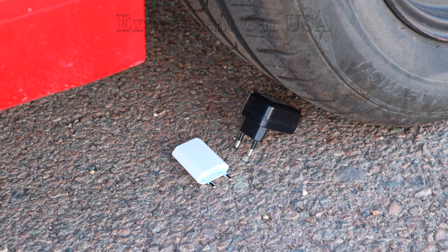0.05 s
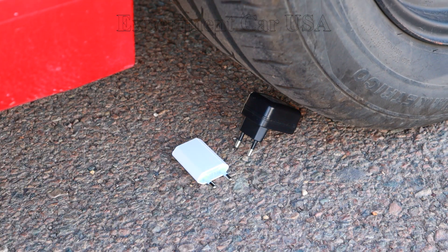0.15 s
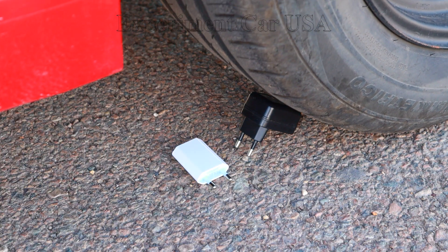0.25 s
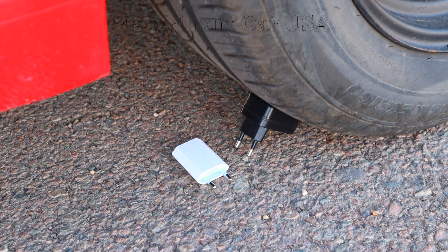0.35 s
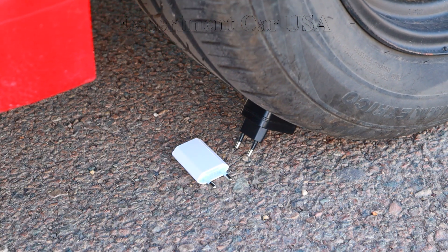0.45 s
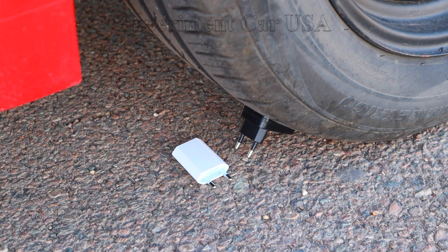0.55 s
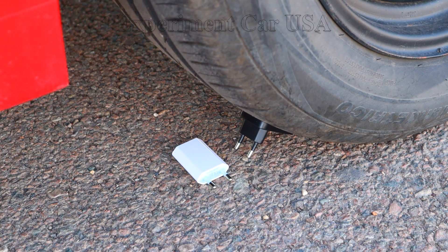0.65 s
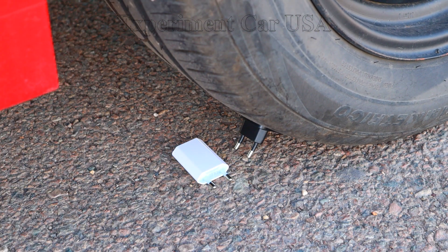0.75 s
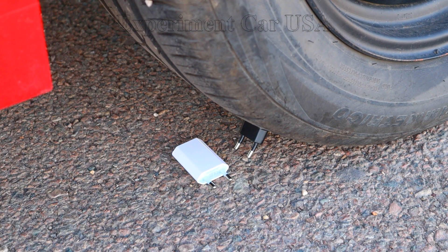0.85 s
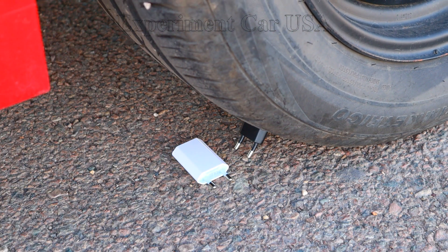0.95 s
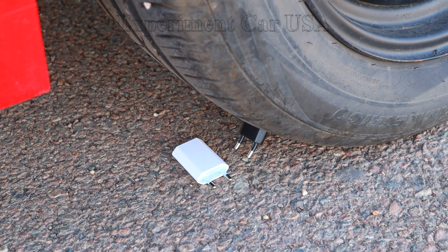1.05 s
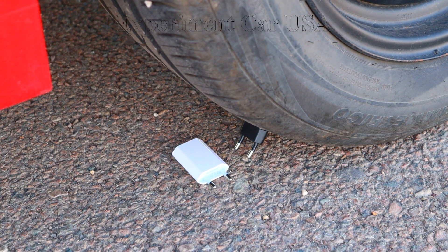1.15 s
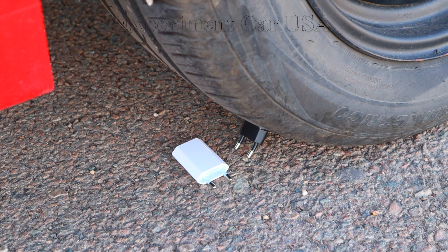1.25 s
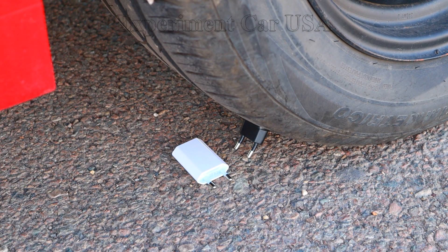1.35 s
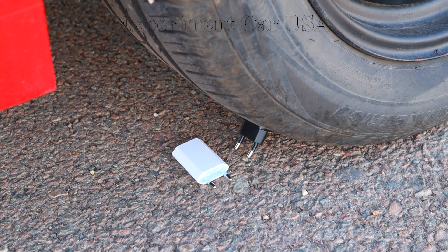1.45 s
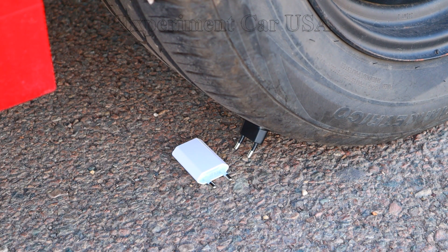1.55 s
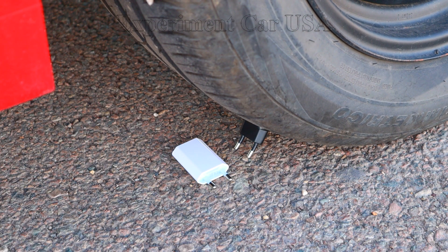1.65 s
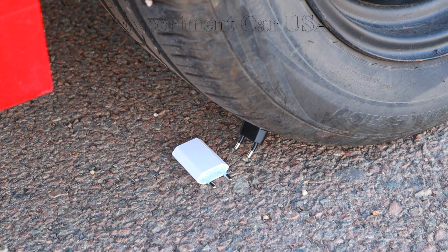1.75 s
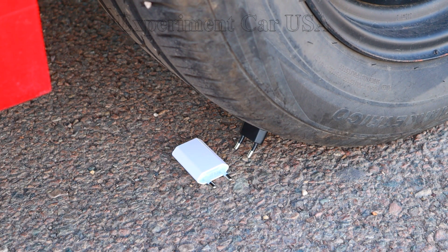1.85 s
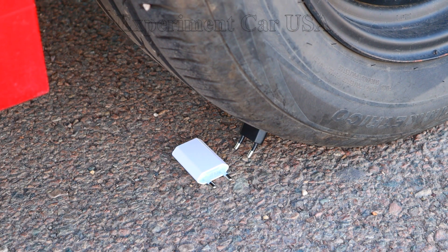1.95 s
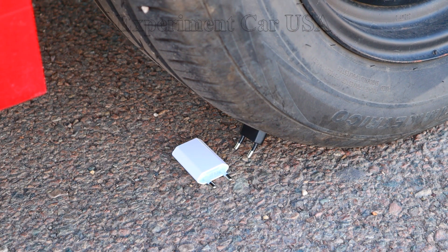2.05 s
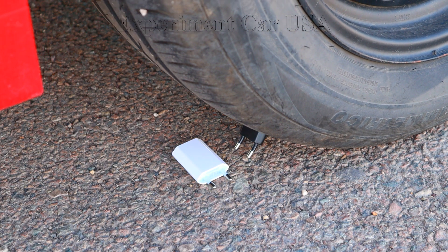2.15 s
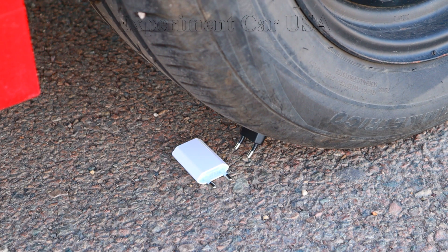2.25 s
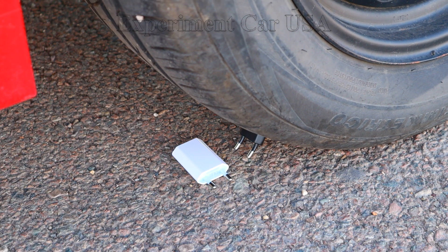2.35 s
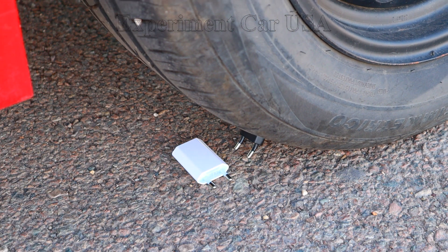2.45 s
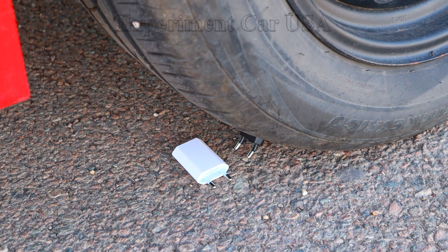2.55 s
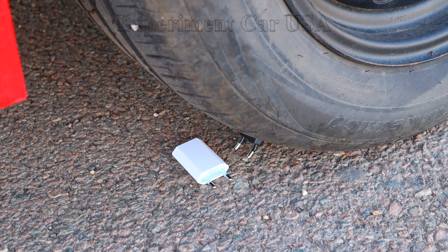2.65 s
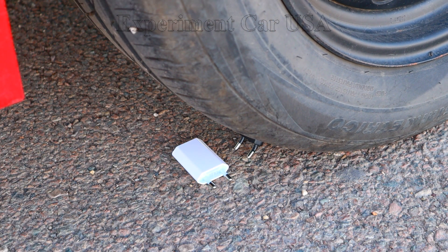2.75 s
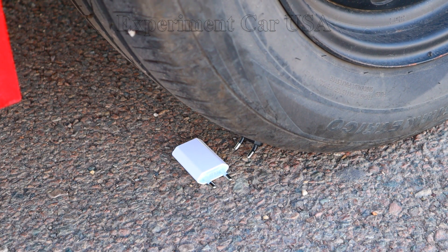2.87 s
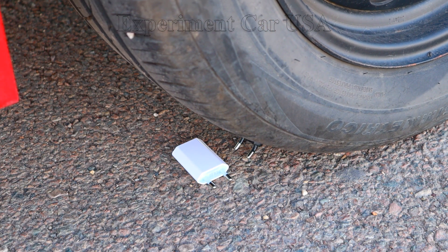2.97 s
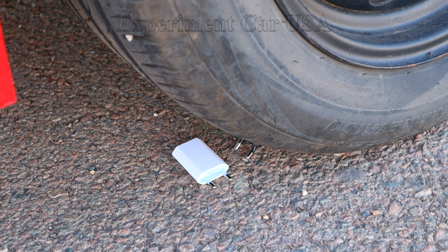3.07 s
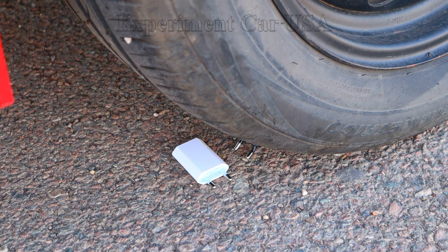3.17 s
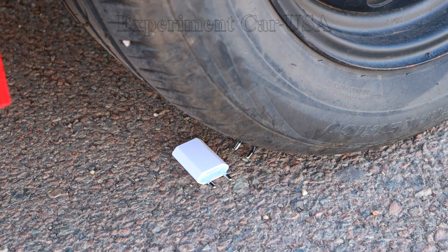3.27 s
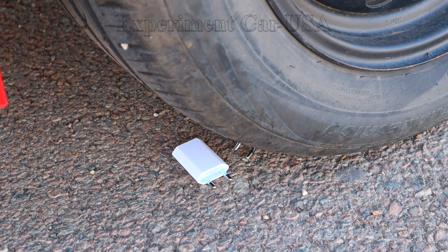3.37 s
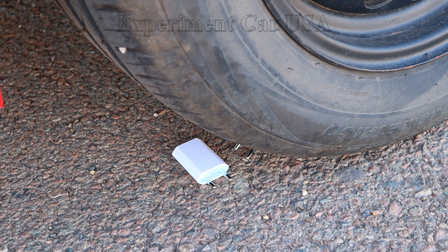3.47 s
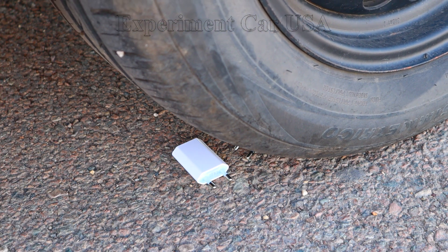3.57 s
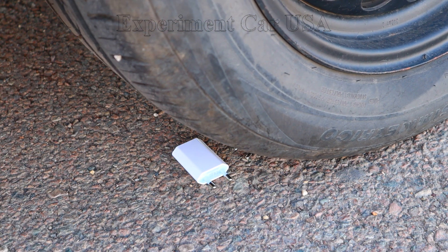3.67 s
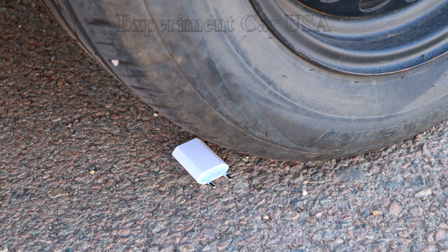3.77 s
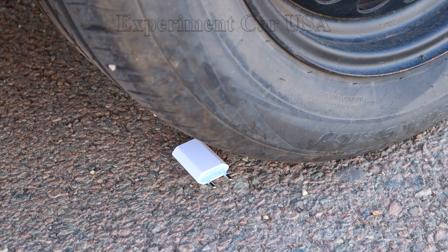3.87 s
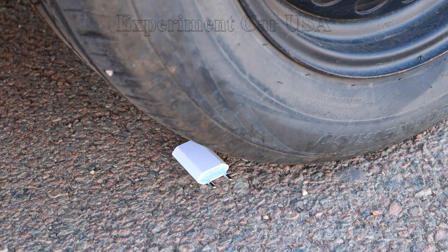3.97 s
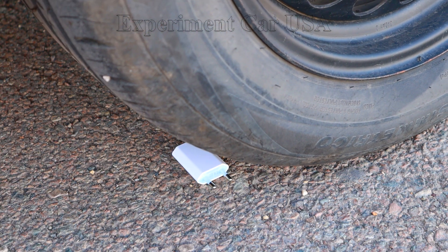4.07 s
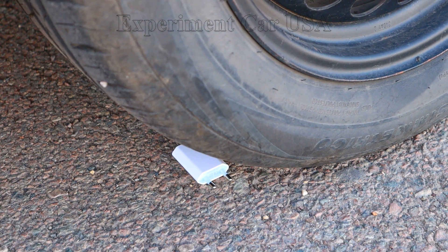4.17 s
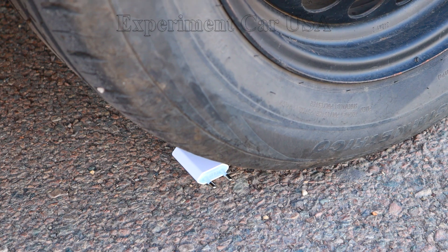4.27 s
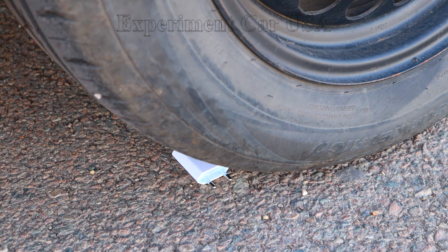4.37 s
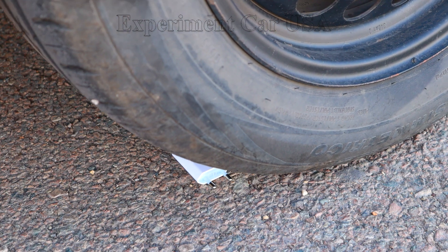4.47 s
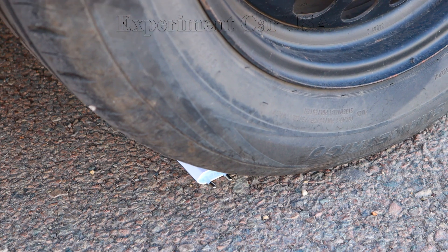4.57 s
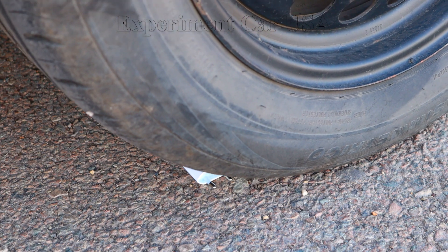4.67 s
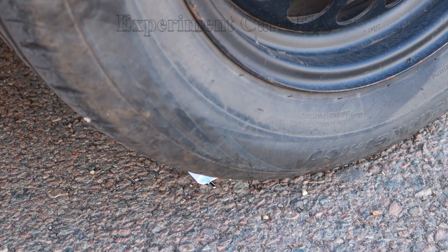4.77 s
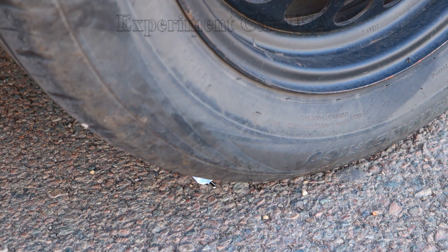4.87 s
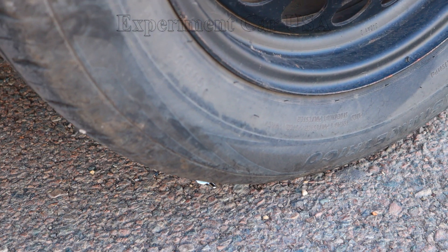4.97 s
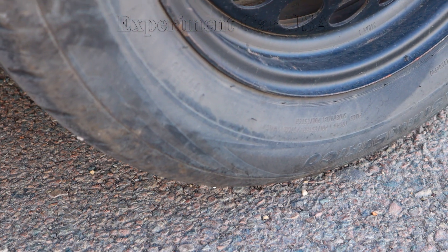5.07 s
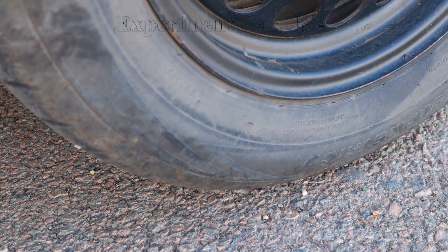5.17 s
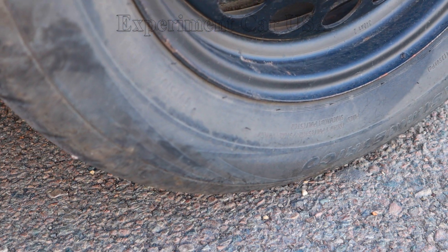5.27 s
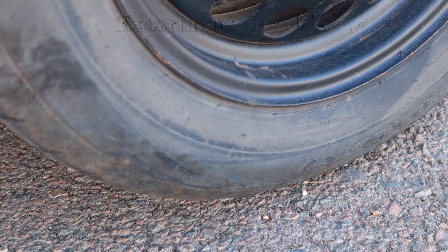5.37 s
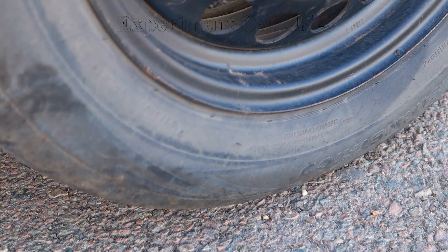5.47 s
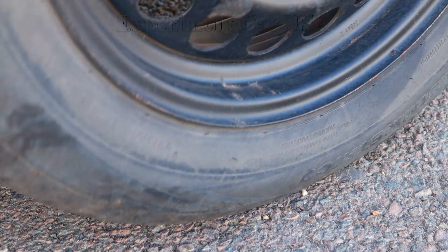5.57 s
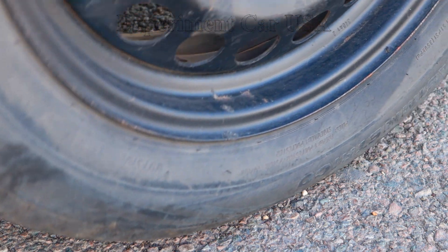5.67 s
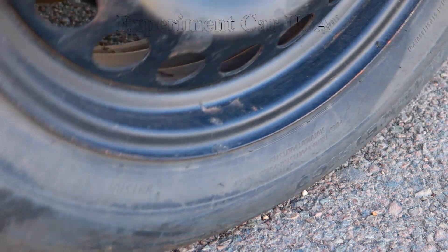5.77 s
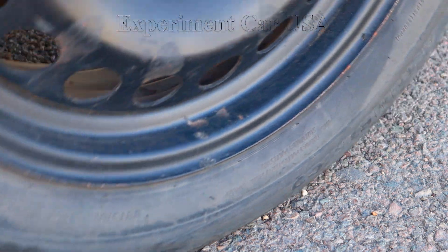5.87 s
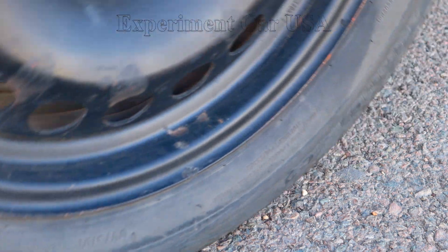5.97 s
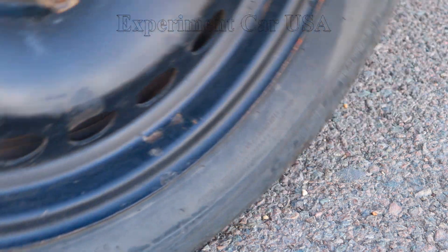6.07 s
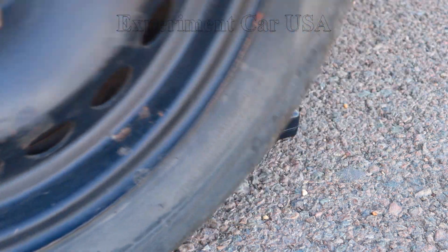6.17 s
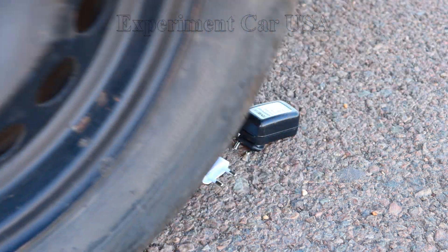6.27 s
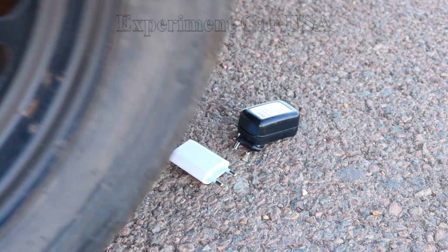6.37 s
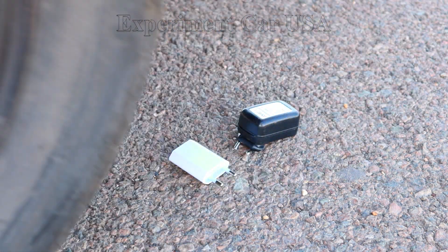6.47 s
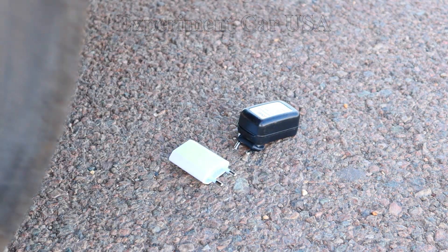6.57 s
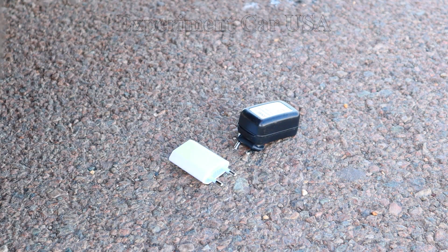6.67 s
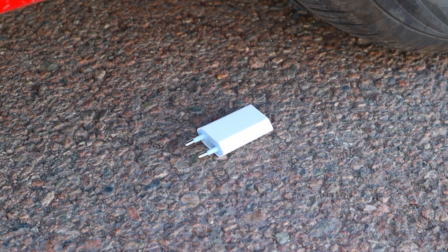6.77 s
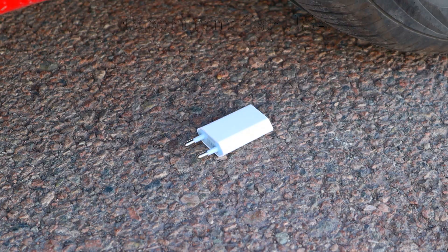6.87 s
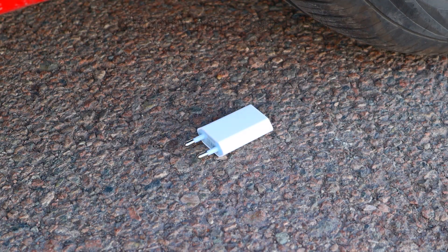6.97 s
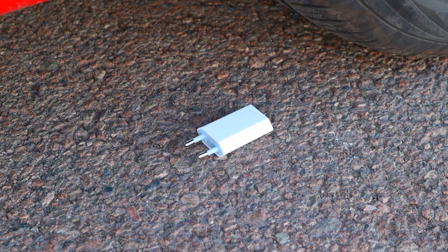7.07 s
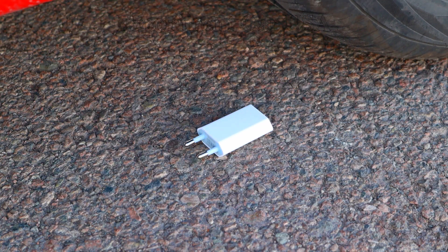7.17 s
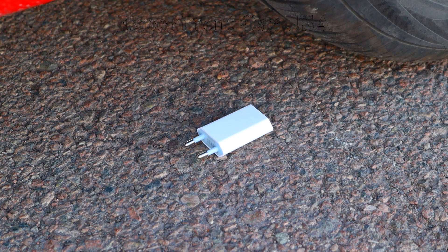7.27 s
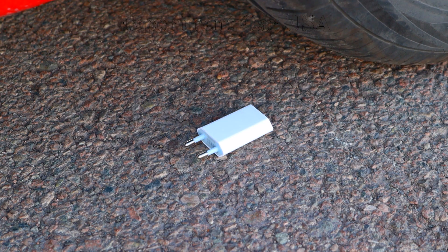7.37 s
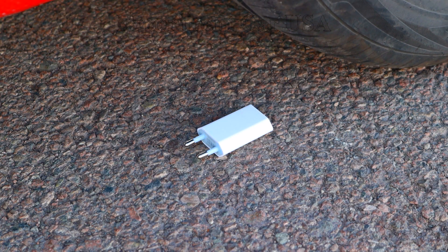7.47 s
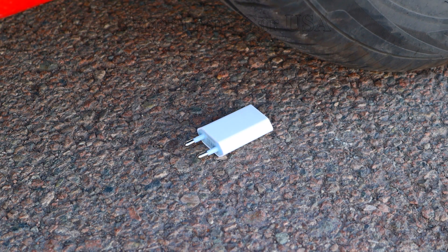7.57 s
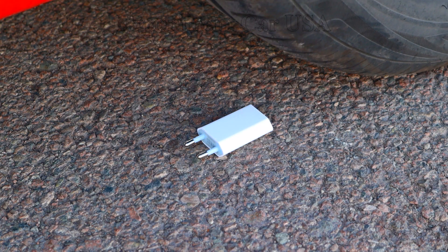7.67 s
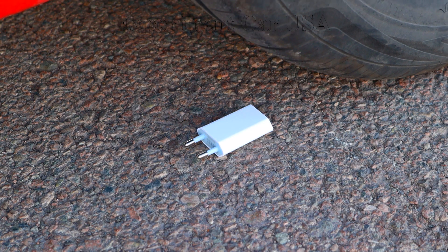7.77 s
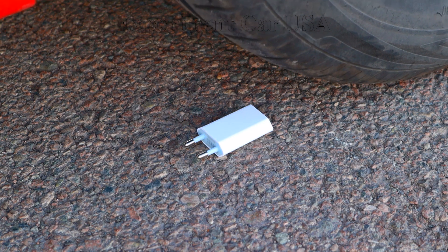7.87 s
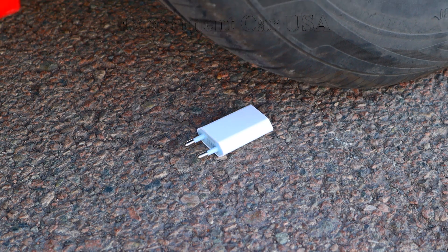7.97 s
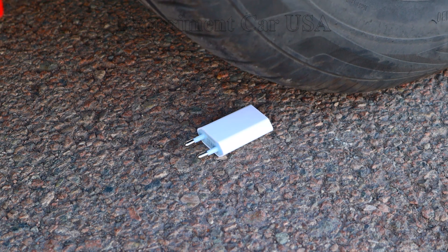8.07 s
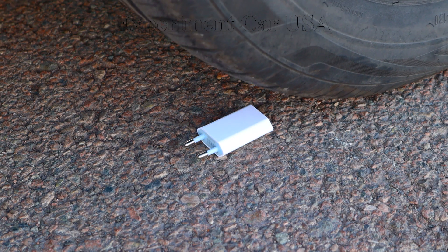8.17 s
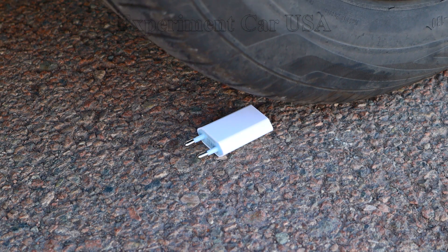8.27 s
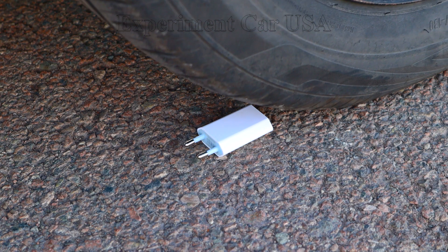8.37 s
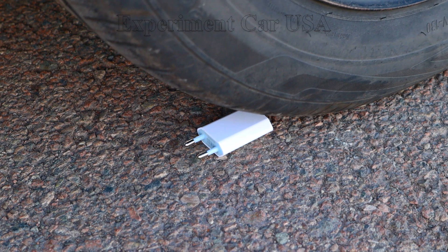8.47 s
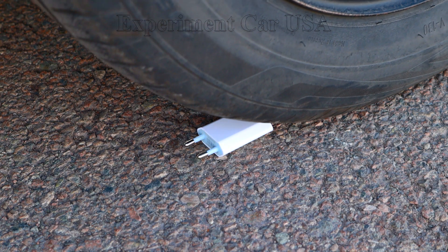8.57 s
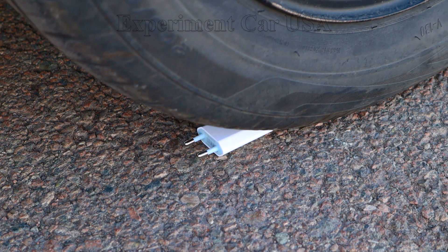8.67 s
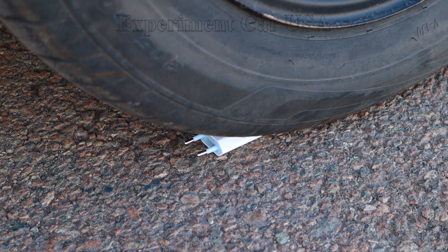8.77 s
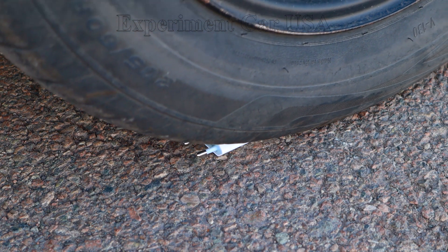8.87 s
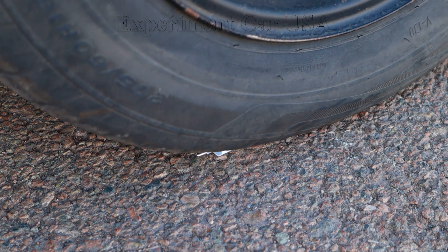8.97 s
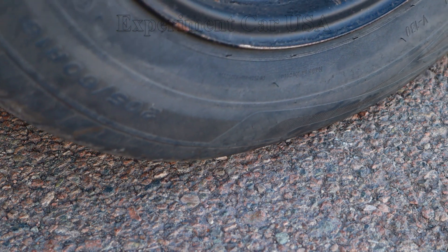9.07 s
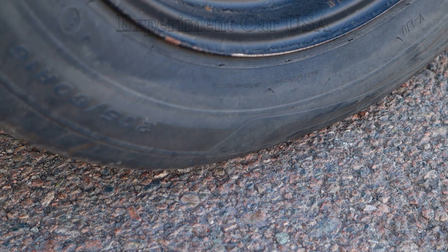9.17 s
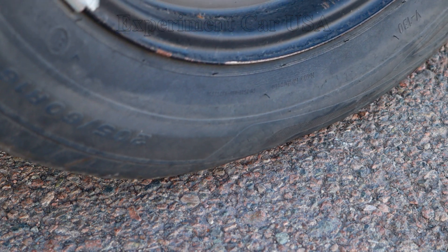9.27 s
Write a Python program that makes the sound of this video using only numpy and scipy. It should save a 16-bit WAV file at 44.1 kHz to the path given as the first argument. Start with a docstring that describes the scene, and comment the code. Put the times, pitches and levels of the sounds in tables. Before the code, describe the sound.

A car tyre creeps over plastic chargers on asphalt, snapping them with sharp, bright cracks over soft, hissy engine noise with a faint rising whine.

```python
"""On asphalt, a car creeps over plastic plug-in chargers, its engine running softly behind the wheel.
Each crack is a burst of tiny fractures that rings the shell for milliseconds and echoes under the car body.
Grinding pieces are uneven slips exciting two resonances; the engine is filtered noise with a tonal whine,
low moans and an exhaust note that follow its speed. The cracks are thin in the bass, the engine is very
wide in the treble, and the close stereo microphone overloads on the loudest cracks."""
import sys
import numpy as np
from scipy import signal
from scipy.fft import rfft, irfft, next_fast_len
from scipy.io import wavfile
from scipy.ndimage import uniform_filter1d

SR = 44100
rng = np.random.default_rng(int(sys.argv[2]) if len(sys.argv) > 2 else 0)


def log_audio(samples):
    """Write samples as a 16-bit WAV file to the path given in sys.argv[1]."""
    # one column per channel
    frames = np.atleast_2d(samples).T
    # limit to full scale, then quantise
    limited = np.clip(frames, -1, 1)
    pcm = np.round(limited * 32767).astype(np.int16)
    wavfile.write(sys.argv[1], SR, pcm)


N = 411012
TIME = np.arange(N) / SR

# shells snapping: (time [s], level [dB], tearing time [ms], shell ring [Hz], shell ring level [dB],
# shell ring width [Hz], shard ring [Hz], shard ring level [dB], shard ring width [Hz],
# tyre knock [dB], echo [dB], added side level [dB])
SHELL_CRACKS = [ (0.5457,-15,1.13,2870,8,780,3700,3.5,2920,-17,-11,-5),
                (0.582,-17,1.14,3036,12.5,476,4020,4,2200,-7,-14,-7.5),
                (.596,-24.5,1.4,3270,6,1390,7920,0,2500,-11,-12,11),
                (0.6349,-24,1.3,3370,8,500,7000,7,3200,-23,-17,-1),
                (0.6411,-9,0.64,3020,1,970,4410,0,1510,-15,-8.5,-2),
                (.698,-32,.9,3400,4.5,1500,10000,4.5,1900,-30,4,1),
                (0.7024,-25.5,0.74,3380,11,643,4900,5.5,2480,-24,-5.5,0.5),
                (.741,-33.5,5,3700,-5,1500,10300,-6,1500,-28,1,1),
                (.764,-37,1.3,3500,-5,400,10300,0,1800,-30,0,1),
                (3.1384,-9.5,1.5,3540,2.5,1150,4740,-1,1590,-36,-10,0),
                (3.1428,-23,1.5,5400,-13,890,10870,9,900,-22,-11,6),
                (3.977,-47.5,1,5500,-6,1490,9000,5.5,3520,-23,-3,7),
                (4.1006,-22.5,1.8,4020,0.5,496,7440,7,3560,-13.5,-4.5,0),
                (4.3792,-29,0.83,3870,-6.5,2500,10300,4,3400,-19,3,5.5),
                (4.6917,-6.5,1.65,4110,-8,430,11020,0,2000,-22,-8.5,3.5),
                (5.075,-4,1.9,4000,-11,1100,9530,1,3000,-15.5,-7.5,2.5),
                (5.4586,-6.5,1.74,4680,-10.5,400,10760,2,3230,-27,-8.5,4.5),
                (5.546,-6,1.2,4200,-9,2550,7500,-9,1116,-35,-11,0.5),
                (5.5497,-6,1.7,4070,-7.5,900,5900,-9,4000,-42,-5.5,4.5),
                (5.5987,-8,1.3,4060,-6.5,427,9300,-21,3100,-27,-19,-5),
                (5.6008,-9,1.9,4600,-19,580,6800,-23,3760,-40,-4,6.5),
                (5.674,-28,1.6,4300,-3.5,1500,10140,-16,1500,-23,3,4.5),
                (5.686,-37,2.4,3000,10,998,4770,8.5,1480,0,4,4.5),
                (5.736,-31.5,2.5,3900,-7,900,7500,-23.5,2510,-18,8,10),
                (5.87,-35,0.49,4800,9,1490,6270,11,1310,1.5,-1,4.5),
                (5.9598,-9.5,2.3,4010,-2,2430,9400,-8.5,2560,-12,-4,3.5),
                (6.101,-10,2.8,2800,-9,900,3820,-3,3250,-38,-2,3),
                (6.1417,-37.5,1.9,2600,12,1480,3530,12.5,1200,-12,2,9),
                (6.278,-31.5,3.3,9830,3,1080,11460,4,900,-22,-5.5,2.5),
                (8.7458,-31,3.3,3560,-10.5,660,11180,-8,920,-14,1.5,-5.5),
                (8.754,-36.5,0.62,3560,-1,660,11090,-3,900,-18,-5,9),
                (8.867,-38.5,1,6500,9,1930,11000,14,900,-7,-4,0.5),
                (8.9183,-27.5,0.62,2870,-2,398,9900,1,4020,-35,-3,-9),
                (8.9277,-25.5,1.6,2900,0.5,400,10500,7,3330,-30,-3.5,-0.5),
                (9.1091,-21.5,2.5,3480,3,497,11500,1.5,4040,-22,-2,0),
                (9.1105,-25,1.3,5400,6.5,700,7500,4.5,2500,-30,-9,0),
                (9.131,-27,1.2,3610,-9,2500,11280,-11,1410,-19,-4,11),
                (9.142,-32,.6,3610,-12,1500,11170,-3,2000,-13,0,3)]
# spectrum of brittle plastic breaking: (frequency [Hz], relative level [dB])
FRACTURE_SPECTRUM = [(500, -13), (1000, -10.5), (2000, -2.5), (3200, -3.5), (5000, 5.5), (7000, 7.5),
                     (9000, 3.5), (11800, 7), (13200, -5), (15500, -2.5)]
# the tyre's own resonances, shaken by every crack: (frequency [Hz], relative level [dB], width [Hz])
TYRE_RESONANCES = [(967, -16, 140), (1278, -1, 227), (1475, -7, 130)]
# sidewall and wheel arch each throw the snap back once: (delay [s], level [dB])
EARLY_REFLECTIONS = [(.0033, -18.5), (.0079, -17)]
# plastic and grit grinding under the tread: (time [s], length [s], level [dB], low ring [Hz],
# high ring [Hz], high ring re low ring [dB], click re low ring [dB])
GRIT_CRUNCHES = [ (1.58, 0.066, -48, 1720, 4280, 0, -19), (1.781, 0.083, -60, 1850, 4300, 11, -8),
                 (1.94, .07, -46, 2250, 4960, 2, -22), (2.526, 0.056, -51.5, 5200, 9100, -8, 6.5),
                 (5.681, 0.052, -42.5, 3050, 4540, 0, -1), (6.136, 0.014, -35, 1500, 3200, 1, -5),
                 (6.181, 0.011, -51.5, 1500, 2730, 9, -8), (6.209, 0.074, -49, 1400, 2250, -1, -9),
                 (6.426, 0.022, -51, 1480, 2300, -9, -6)]
# the tyre slips off an edge and knocks on the ground: (time [s], level [dB])
TYRE_KNOCKS = [(3.79, -39), (5.869, -45.5)]
# the driver presses the throttle: (start [s], rise time [s], let go at [s], effort [0-1])
THROTTLE_PRESSES = [(-.1, .25, .2, .48), (.2, .3, 1.3, .23), (1.18, .7, 3.06, 1.0), (3.15, .98, 4.73, .68),
                    (5.45, 2.6, 9.3, .62)]
# engine speed arches up and back: (time of top [s], length [s], rise of the whine [Hz])
ENGINE_REVS = [(2.15, 1.75, 233), (4.166, 1.0, 66.2), (6.781, 1.0, 388.4), (8.041, 2.4, 1113),
               (9.299, 1.35, 390.6)]
# low moans as the drive takes up the load: (time of top [s], length [s], level [dB])
LOAD_MOANS = [(2.193, 0.75, -66.5), (9.087, 1, -70.5)]
# shapes of the engine noises: (frequency [Hz], relative level per hertz [dB])
RUMBLE_SPECTRUM = [(40, -66.5), (90, -32), (170, -44.5), (330, -27.5), (450, -20), (620, -8), (870, 0.5),
                   (1100, 2), (1800, -12), (5000, -32.5)]
BLOCK_SPECTRUM = [(150, -68.5), (700, -24), (1250, -6), (1550, -4.5), (1850, 0), (2100, -1), (2450, -2.5),
                  (2850, 0.5), (3130, 1), (3450, -5), (7000, -41)]
BELT_SPECTRUM = [(200, -87), (2400, 0.5), (3100, -0.5), (3650, 1), (4200, 2.5), (4950, 3), (5800, 1),
                 (8000, -5.5), (11500, -8), (12500, -7), (13800, -15.5), (15500, -49)]
# metal resonances singing in the belt hiss: (frequency [Hz], width [Hz], level re the hiss [dB])
PULLEY_RESONANCES = [(3130, 170, -17), (4290, 130, -18), (4680, 120, -18), (4950, 140, -15)]
# width of the microphone pair: (frequency [Hz], side minus mid for the engine [dB],
# side minus mid for the nearer cracks [dB])
STEREO_WIDTH = [(98.3, -11, -8), (241.5, -9.5, -25), (706, -5.5, -0.5), (1301, 2, -8.5), (2000, 3.5, -3.5),
                (3000, 11.5, -3.5), (3750, 7.5, -8), (4900, 4.5, -3), (7160, 12, -2), (8530, 6.5, -3.5),
                (15300, 3, 3)]
ENGINE_COLUMN, CRACK_COLUMN = 1, 2

SLIPS_PER_S = 550
CRUNCH_WIDTH_HZ, CRUNCH_ECHO_DB, CRUNCH_SIDE_DB = 220, 0, 3
LEVEL_WINDOW_S = .005  # a crack's level is its energy spread over this time
EASE_OFF_S, LET_GO_S = 2.0, .14  # decay times of effort while easing off and after letting go
# levels at zero effort, and what an effort of 1 adds
RUMBLE_IDLE_DB, RUMBLE_EFFORT_DB = -67.2, 9
BLOCK_IDLE_DB, BLOCK_EFFORT_DB = -48.5, 10.5
BELT_IDLE_DB, BELT_EFFORT_DB = -53.3, 18.8
EXHAUST_IDLE_DB, EXHAUST_EFFORT_DB = -111, 19
# on its second approach the car stands so that rumble, whine and exhaust come through more strongly
SECOND_PASS_S, PASS_FADE_S = 6.8, .04
PASS_RUMBLE_DB, PASS_WHINE_DB, PASS_EXHAUST_DB = 5.5, 6.5, 4
IDLE_WHINE_HZ, REV_ROUNDNESS = 793, 1.9
TOP_RISE_HZ = 911  # the driver holds the engine at this rise above idle
WHINE_PER_FIRING = 27  # whine cycles for each firing
# the whine sets in above idle, grows with effort and recedes while the engine picks up speed
WHINE_DB, WHINE_EFFORT_DB, WHINE_ONSET_HZ = -66.5, 6.5, 55
PICKUP_HZ_PER_S, PICKUP_WHINE_DB = 630, -3
WHINE_WAVER, WHINE_FLICKER_DB = .016, 3.5  # random spread of its pitch (as a fraction) and level
SQUEAK_HZ, SQUEAK_SPAN_HZ, SQUEAK_DB = 1290, 50, 9
TOP_HZ = 15900


def chargers(low_cut_hz=750, left_db=0.76):
    """Superposition: cracks, crunches and knocks add linearly, each with its own energy and width."""
    t = np.arange(SR // 5) / SR
    scale = np.sqrt(LEVEL_WINDOW_S / t[-1])
    out = np.zeros((2, N + len(t)))

    def add(s, db, sound, side_db):
        """Linear addition of one delayed sound, shared between the microphones."""
        start = int(s * SR)
        out[:, start:start + len(t)] += scale * undb(db) * left_right(*sound, CRACK_COLUMN, side_db)

    for s, db, tear_ms, *rings, knock_db, echo_db, side_db in SHELL_CRACKS:
        add(s, db, crack(t, tear_ms, rings[:3], rings[3:], knock_db, echo_db), side_db)
    for s, length_s, db, *rings in GRIT_CRUNCHES:
        # a crunch's level is its energy spread over its own length
        sound = crunch(t, length_s, *rings) * np.sqrt(length_s / LEVEL_WINDOW_S)
        add(s, db, sound, CRUNCH_SIDE_DB)
    for s, db in TYRE_KNOCKS:
        add(s, db, tyre_knock(t), side_db=4.5)
    low_cut = signal.butter(4, low_cut_hz, "high", fs=SR, output="sos")
    heard = signal.sosfilt(low_cut, out[:, :N])
    return heard * undb(np.array([[left_db], [-left_db]]) / 2)


def crack(t, tear_ms, shell, shard, knock_db, echo_db, rise_s=0.00011, grain_db=1.0, grain_s=0.00032):
    """Impulsive excitation: a run of tiny fractures rings shell, shards and tyre; mid and side."""
    grain_index = (t / grain_s).astype(int).clip(0, len(t) - 1)
    grains = undb(grain_db * rng.standard_normal(len(t)))[grain_index]
    force = grains * np.exp(-t / (tear_ms / 1000)) * (1 - np.exp(-t / rise_s))
    direct = burst_pair(force)
    early = np.zeros_like(direct)
    for delay_s, db in EARLY_REFLECTIONS:
        early += undb(db) * np.pad(direct, ((0, 0), (int(delay_s * SR), 0)))[:, :len(t)]
    # the later echoes are too dense to tell apart; rubber and rough asphalt swallow their top
    echo_swell = np.sqrt(np.abs(signal.fftconvolve(force ** 2, underbody(t))[:len(t)]))
    echoes = colour(burst_pair(echo_swell), [(1000, 0.0), (11800, -3.5), (15000, -5.5)])
    push = direct + early + undb(echo_db) * echoes

    def body(hz, db, width_hz, skirt):
        """Two resonators in cascade: the second, wider one steepens the flanks."""
        narrow = ring(push, hz, width_hz)
        return undb(db) * unit(ring(narrow, hz, min(skirt * width_hz, SR / 3)))

    tyre = undb(knock_db) * sum(body(*mode, 4) for mode in TYRE_RESONANCES)
    return unit(colour(push, FRACTURE_SPECTRUM)) + body(*shell, 1.64) + body(*shard, 2.05) + tyre


def burst_pair(envelope):
    """Two incoherent noises under one envelope, flattened in spectrum, for mid and side."""
    noise = rng.standard_normal((2, len(envelope))) * envelope
    return unit(np.array([even(burst) for burst in noise]))


def even(x, size=200):
    """Spectral whitening: a burst of even spectrum strikes all resonances alike."""
    power = uniform_filter1d(np.abs(rfft(x)) ** 2, size) + 1e-12
    return colour(x, np.c_[np.fft.rfftfreq(len(x), 1 / SR) + 1, -10 * np.log10(power)])


def underbody(t, t60=0.1, late_t60=0.11, late_db=-25, gap_s=0.0011):
    """Reverberant decay: dense echo power between asphalt, tyre and floor pan, then faint surroundings."""
    decay = undb(-60 * t / t60) + undb(late_db - 60 * t / late_t60)
    power = (decay * (1 - np.exp(-(t / gap_s) ** 2))) ** 2
    return power / power.sum()


def crunch(t, length_s, low_hz, high_hz, high_db, click_db, scatter_db=4):
    """Stick-slip friction: uneven random slips ring two resonances of the trapped piece; mid and side."""
    swell = np.sqrt(np.sin(np.pi * np.clip(t / length_s, 0, 1)).clip(0))
    happens = rng.random(len(t)) < SLIPS_PER_S / SR
    slips = happens * swell * undb(scatter_db * rng.standard_normal(len(t)))
    echoes = undb(CRUNCH_ECHO_DB) * np.sqrt(underbody(t)) * rng.standard_normal((2, len(t)))
    paths = echoes + (t == 0)  # the direct path is a unit impulse
    push = signal.fftconvolve(slips[None], paths, axes=1)[:, :len(t)]
    low, high = (unit(ring(ring(push, hz, CRUNCH_WIDTH_HZ), hz, hz / 2)) for hz in (low_hz, high_hz))
    return low + undb(high_db) * high + undb(click_db) * unit(colour(push, FRACTURE_SPECTRUM))


def tyre_knock(t):
    """Impact excitation: a short crack-like blow in which the tyre resonances are strong."""
    return crack(t, tear_ms=0.84, shell=(3070, -5, 540), shard=(5600, 7, 1900), knock_db=11.5, echo_db=-0.5)


def engine():
    """Order-related sound: noise throbs with the firings; whine, moan and exhaust share one phase."""
    effort = throttle()
    second_pass = np.clip((TIME - SECOND_PASS_S) / PASS_FADE_S, 0, 1)
    revs = sum(hz * arch(s, length_s) ** REV_ROUNDNESS for s, length_s, hz in ENGINE_REVS)
    rise_hz = revs.clip(max=TOP_RISE_HZ)
    whine_hz = IDLE_WHINE_HZ + rise_hz
    phase = 2 * np.pi * np.cumsum(whine_hz * (1 + WHINE_WAVER * walk(90))) / SR
    firing = phase / WHINE_PER_FIRING
    tones = whine(phase, whine_hz, rise_hz, effort, second_pass) + moan(phase)
    left_leaning = np.array([[1.2], [.8]]) * tones
    return engine_noise(firing, effort, second_pass) + left_leaning + exhaust(firing, effort, second_pass)


def throttle():
    """Effort over time: each press rises smoothly, relaxes exponentially, then faster once let go."""
    effort = np.zeros(N)
    for s, rise_s, end_s, depth in THROTTLE_PRESSES:
        rise = np.sin(np.pi / 2 * np.clip((TIME - s) / rise_s, 0, 1)) ** 2
        fall = np.maximum(TIME - s - rise_s, 0) / EASE_OFF_S + np.maximum(TIME - end_s, 0) / LET_GO_S
        effort += depth * rise * np.exp(-fall)
    return effort


def whine(phase, whine_hz, rise_hz, effort, second_pass, octave_db=-8):
    """Tone and octave at a multiple of firing rate; resonance lifts it, but not in fast pickup."""
    pickup = np.clip(np.gradient(whine_hz, TIME) / PICKUP_HZ_PER_S, 0, 1)
    level_db = WHINE_DB + WHINE_EFFORT_DB * effort + PASS_WHINE_DB * second_pass + PICKUP_WHINE_DB * pickup
    detuning = (whine_hz - SQUEAK_HZ) / SQUEAK_SPAN_HZ
    squeak_db = SQUEAK_DB / (1 + detuning ** 2) * (1 - pickup)
    onset = rise_hz / (rise_hz + WHINE_ONSET_HZ)
    tone = np.sin(phase) + undb(octave_db) * np.sin(2 * phase)
    return tone * undb(level_db + squeak_db + WHINE_FLICKER_DB * walk(20)) * onset


def moan(phase, noise_share=0.57):
    """Subharmonic: a tone at half the whine frequency, with resonant noise, swells under load."""
    load = sum(undb(db) * np.sqrt(arch(s, length_s)) for s, length_s, db in LOAD_MOANS)
    breath = unit(ring(ring(rng.standard_normal(N), 530, 110), 552, 74))
    return (np.sin(phase / 2) + noise_share * breath) * load * undb(2 * walk(19))


def exhaust(firing, effort, second_pass):
    """Pipe resonance: fluctuating firing harmonics 3 to 8 excite a low resonance."""
    pulses = sum(np.sin(k * firing) * undb(4 * walk(16)) for k in range(3, 9))
    level_db = EXHAUST_IDLE_DB + EXHAUST_EFFORT_DB * effort + PASS_EXHAUST_DB * second_pass
    return unit(ring(ring(pulses, 190, 70), 178, 63)) * undb(level_db)


def engine_noise(firing, effort, second_pass, throb_db=0.63, flutter_db=-0.4, left_share=0.66):
    """Amplitude modulation: rumble, block noise and belt hiss grow with effort and throb with firing."""
    throb = throb_db * np.cos(firing) + flutter_db * walk(6.9)
    rumble_db = RUMBLE_IDLE_DB + RUMBLE_EFFORT_DB * effort + PASS_RUMBLE_DB * second_pass + throb
    block_db = BLOCK_IDLE_DB + BLOCK_EFFORT_DB * effort + throb
    belt_db = BELT_IDLE_DB + BELT_EFFORT_DB * effort + throb
    rumble, block = rush(RUMBLE_SPECTRUM, rumble_db), rush(BLOCK_SPECTRUM, block_db)
    belt = rush(BELT_SPECTRUM, belt_db) + pulleys(belt_db)
    mid, side = cavity(rumble + block + belt)
    # the engine bay lies to the left, so the side signal partly follows the mid
    side = (side + left_share * mid) / np.hypot(1, left_share)
    return left_right(mid, side, ENGINE_COLUMN)


def rush(spectrum, db, flicker_db=1.63):
    """Band-filtered noise: incoherent mid and side; half-octave bands fluctuate independently."""
    bins = rfft(colour(rng.standard_normal((2, N)), spectrum), next_fast_len(N))
    bin_hz = np.clip(np.linspace(0, SR / 2, bins.shape[1]), 500, 12000)  # the ends form one band each
    band = np.floor(2 * np.log2(bin_hz))
    noise = sum(irfft(bins * (band == k))[:, :N] * undb(flicker_db * walk(22)) for k in np.unique(band))
    return unit(noise) * undb(db)


def pulleys(db, swell_db=4.5):
    """Resonance under noise: narrow metal modes sing, each swelling on its own; mid and side."""
    total = np.zeros((2, N))
    for hz, width_hz, ring_db in PULLEY_RESONANCES:
        swell = undb(ring_db + swell_db * walk(10))
        total += swell * unit(ring(ring(rng.standard_normal((2, N)), hz, width_hz), hz, 2 * width_hz))
    return undb(db) * total


def cavity(x, t60=0.033, echo_db=-16):
    """Interference: dense echoes under the car stamp fixed narrow resonances on a steady sound."""
    t = np.arange(SR // 10) / SR
    echoes = unit(rng.standard_normal((2, len(t))) * undb(-60 * t / t60)) / np.sqrt(len(t))
    return x + undb(echo_db) * signal.fftconvolve(x, echoes, axes=1)[:, :N]


def left_right(mid, side, column, extra_db=0):
    """Mid-side stereophony: share the power by frequency, then take the sum and difference."""
    width = np.array(STEREO_WIDTH)
    hz, width_db = width[:, 0], width[:, column] + extra_db
    mid_db = -10 * np.log10(1 + undb(width_db) ** 2)
    mid = colour(mid, np.c_[hz, mid_db])
    side = colour(side, np.c_[hz, mid_db + width_db])
    return np.array([mid + side, mid - side])


def arch(top_s, length_s):
    """Half a cosine in time: from 0 up to 1 and back."""
    return np.cos(np.pi * np.clip((TIME - top_s) / length_s, -.5, .5)).clip(0)


def walk(rate):
    """Slow random fluctuation: normal values, rate per second, joined by lines; spread near 1."""
    knots = rng.standard_normal(1000)
    return np.interp(TIME * rate, np.arange(len(knots)), knots)


def ring(x, hz, width_hz):
    """Damped oscillator: one resonance of the given bandwidth."""
    return signal.lfilter(*signal.iirpeak(hz, hz / width_hz, fs=SR), x)


def colour(x, points):
    """Minimum-phase filtering: a causal filter with the given (frequency [Hz], level [dB]) response."""
    n = x.shape[-1]
    size = 2 * next_fast_len(n)
    hz, db = np.transpose(points)
    bin_hz = np.fft.rfftfreq(size, 1 / SR) + 1
    cepstrum = irfft(np.log(undb(np.interp(np.log(bin_hz), np.log(hz), db))))
    # folding the cepstrum onto positive times makes the response causal
    cepstrum[1:size // 2] *= 2
    cepstrum[size // 2 + 1:] = 0
    return irfft(rfft(x, size) * np.exp(rfft(cepstrum)))[..., :n]


def undb(db):
    """Logarithmic level: decibels to amplitude gain."""
    return 10 ** (np.asarray(db) / 20)


def unit(x):
    """Power normalisation: scale each channel to rms 1."""
    return x / np.sqrt(np.mean(x ** 2, axis=-1, keepdims=True))


def scene():
    """Superposition of breaking plastic and the running engine."""
    return chargers() + engine()


def record(dry, ceiling=0.94, lopsided=0.0012):
    """Overload: peaks clip, a slight square term adds a dull thud to loud cracks, and the top is cut."""
    clipped = np.clip(dry, -ceiling, ceiling)
    top_cut = signal.ellip(8, .2, 70, TOP_HZ, fs=SR, output="sos")
    return signal.sosfilt(top_cut, clipped + lopsided * clipped ** 2)


dry = scene()
out = record(dry)
log_audio(out)
```